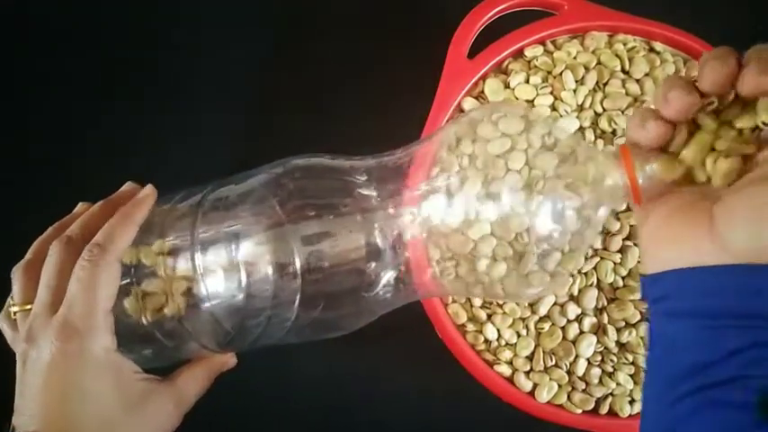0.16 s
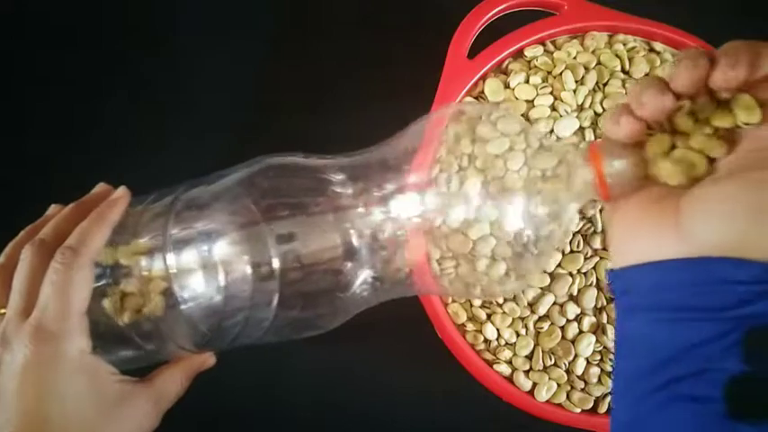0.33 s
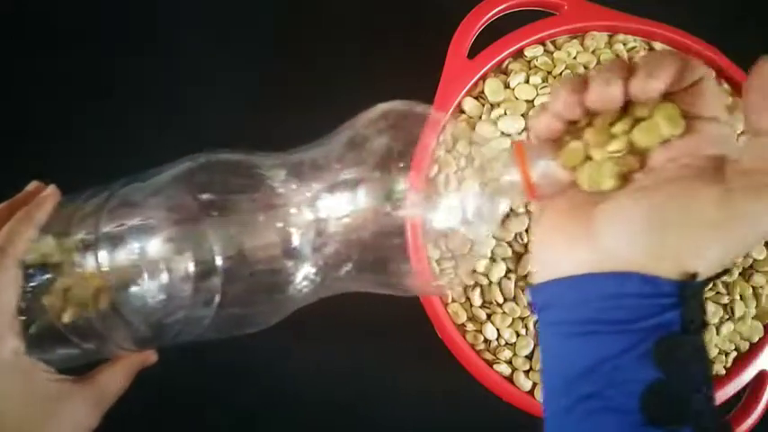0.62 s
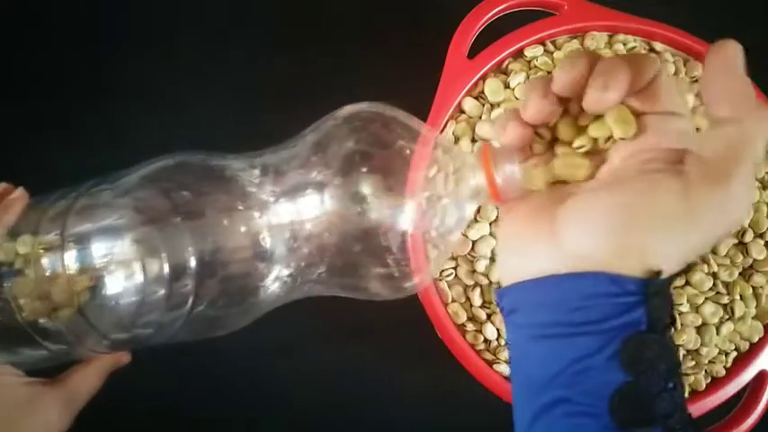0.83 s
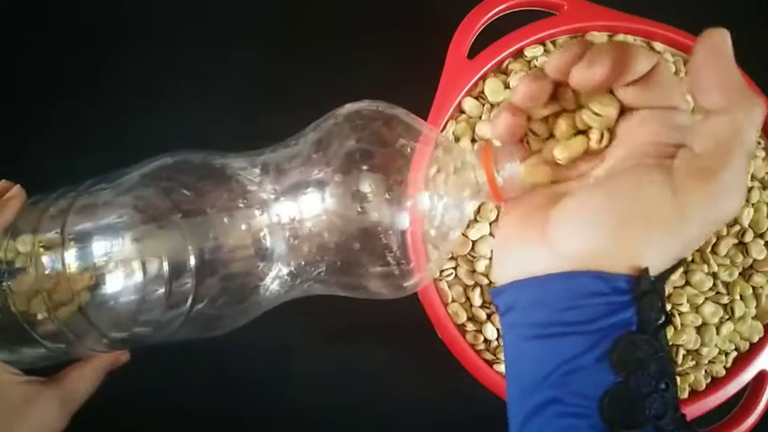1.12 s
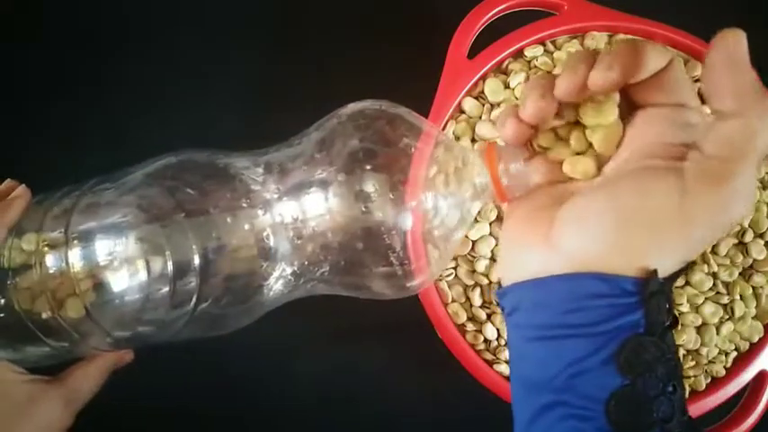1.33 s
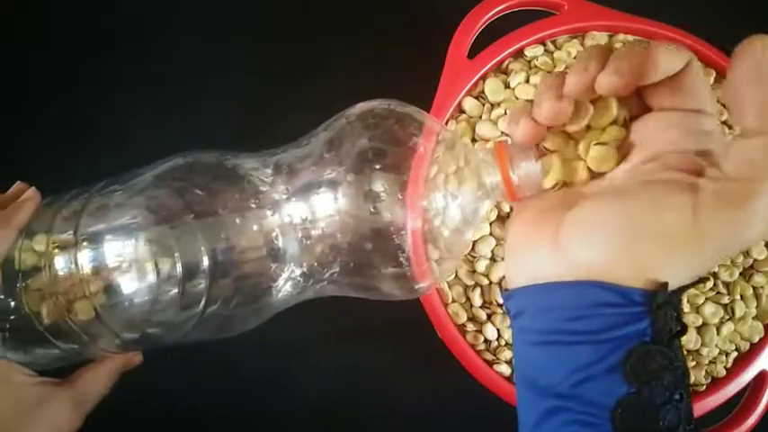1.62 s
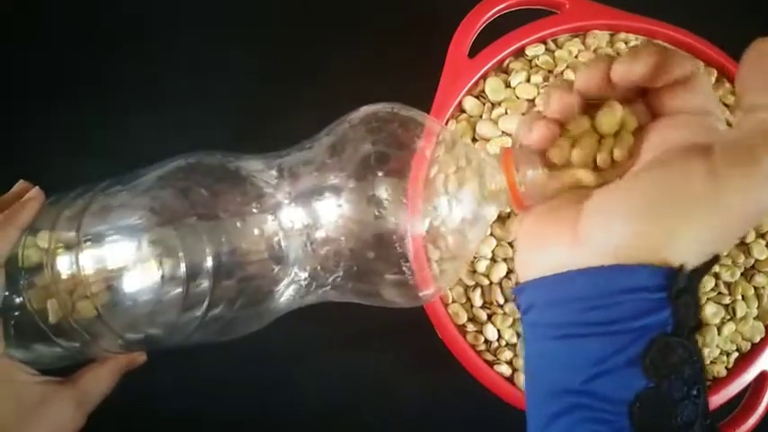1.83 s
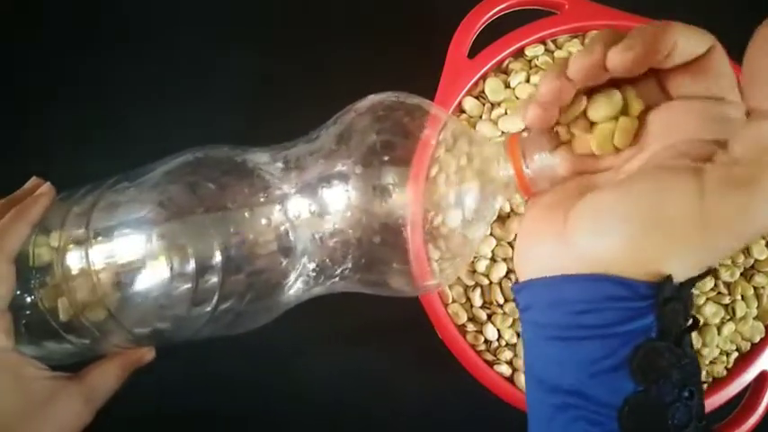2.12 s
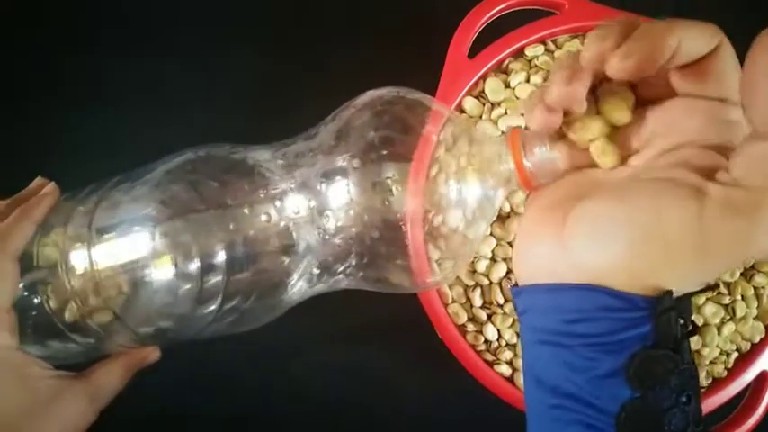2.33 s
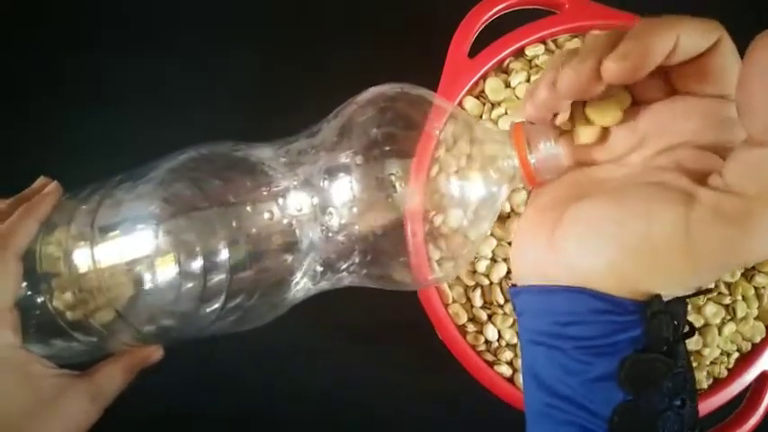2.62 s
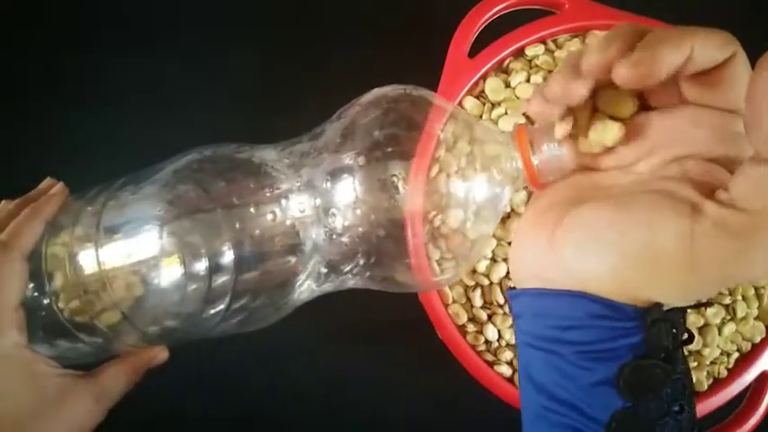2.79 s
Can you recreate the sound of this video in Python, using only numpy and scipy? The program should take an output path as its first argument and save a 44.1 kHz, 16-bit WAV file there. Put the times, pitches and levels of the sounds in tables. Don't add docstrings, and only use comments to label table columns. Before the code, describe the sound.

Dried beans rattle inside a plastic bottle for about three seconds. From 0 to 1 s they slide in, with a strong clack near 0.4; from 1 to 1.9 s they bounce in separate knocks, loudest near 1.5; then a denser slide clatters until the end. Dry midrange clacks, small bright clicks and a faint hollow hum, close, in a quiet small kitchen.

```python
import sys
import numpy as np
from scipy import signal
from scipy.fft import rfft, irfft, next_fast_len
from scipy.io import wavfile
from scipy.ndimage import uniform_filter1d

SR = 44100
rng = np.random.default_rng(int(sys.argv[2]) if len(sys.argv) > 2 else 0)


def file_out(sig):
    cols = np.atleast_2d(sig).T
    lim = np.clip(cols, -1, 1)
    pcm = np.round(lim * 32767).astype(np.int16)
    wavfile.write(sys.argv[1], SR, pcm)


def ratio_of_db(decibels):
    return 10 ** (np.asarray(decibels, float) / 20)


N = 130095


def along(points, hz):
    point_hz, value = np.transpose(points)
    return np.interp(np.log(hz + 1), np.log(point_hz + 1), value)


def filtered(x, points):
    size = next_fast_len(N + 8192)
    gain = ratio_of_db(along(points, np.fft.rfftfreq(size, 1 / SR)))
    gain = gain / np.sqrt(np.mean(gain ** 2))
    return irfft(rfft(x, size) * gain, size)[..., :N]


# frequency in Hz, level in dB per Hz.
AIR_COLOUR = [(20, 3), (90, 0), (200, -20), (300, -12), (500, 6), (5000, -11), (16000, -16)]


def air():
    a, b = filtered(rng.standard_normal((2, N)), AIR_COLOUR)
    return ratio_of_db(-63) * np.array([a + 1.1 * b, a - 0.74 * b])


RISE_S = 0.00056


def laid(times, shapes):
    land_s = 0.0011
    first = np.round((times + land_s) * SR).astype(int)
    at = first[:, None] + np.arange(shapes.shape[-1])
    return np.array([np.bincount(at.ravel(), side.ravel(), N + SR)[:N] for side in shapes])


def ringing(modes, weight_db, lag_s):
    hz, db, t60 = np.transpose(modes)
    t = np.arange(SR // 18) / SR
    rise = (1 - np.exp(-t / RISE_S)) ** 2
    fade_out = np.cos(t / t[-1] * np.pi / 2)
    fall = ratio_of_db(-60 * t / t60[:, None]) * rise * fade_out
    turn = 2 * np.pi * hz[:, None] * t
    sines, cosines = fall * np.sin(turn), fall * np.cos(turn)
    draw = rng.standard_normal((len(lag_s), 2, len(hz)))
    gain = ratio_of_db(db + weight_db + 4.5 * draw[:, 0])
    gain = gain / np.linalg.norm(gain, axis=1, keepdims=True)
    sides = []
    for side in (1, -1):
        phase = 0.79 * draw[:, 1] + side * np.pi * hz * lag_s[:, None]
        sides.append((gain * np.cos(phase)) @ sines + (gain * np.sin(phase)) @ cosines)
    return np.array(sides)


# frequency in Hz, level in dB, time to fall by 60 dB in seconds.
SHOULDER_TONES = [(1850, 7.5, 0.016), (2091, 5, 0.014), (2400, -4, 0.034), (2860, -2, 0.027),
                  (2980, 1, 0.026), (3400, 4, 0.0025), (4080, 6, 0.011)]


def shoulder_ring(centre_hz, lag_s):
    octave_like = np.log(np.array(SHOULDER_TONES)[:, 0] / centre_hz[:, None])
    near_db = -6 * (octave_like / 0.3) ** 2
    return ratio_of_db(-1) * ringing(SHOULDER_TONES, np.maximum(near_db, -18), lag_s)


# frequency in Hz, level in dB, time to fall by 60 dB in seconds.
HOLLOW_TONES = [(267, -14, 0.074), (373.6, 1.5, 0.049), (448, 12.5, 0.017), (711, -13.5, 0.19),
                (923, -1, 0.032), (1275, 5, 0.024)]


def hollow_thump(lag_s):
    left_db = 5
    sides = ratio_of_db(np.array([.5, -.5]) * left_db)[:, None, None]
    return ratio_of_db(-2) * sides * ringing(HOLLOW_TONES, 0, 0.5 * lag_s)


def dull_knock(hiss, t):
    return ratio_of_db(1.5) * np.repeat(hiss[2:], 2, axis=0) * ratio_of_db(-60 * t / 0.013)


def column(x):
    hz, t60_s = 694.2, 0.3
    keep = ratio_of_db(-60 / (t60_s * SR))
    feedback = [1, -2 * keep * np.cos(2 * np.pi * hz / SR), keep ** 2]
    return ratio_of_db(9.5) * signal.lfilter([1 - keep, 0, keep - 1], feedback, x)


# frequency in Hz, level in dB per Hz.
CLACK_COLOUR = [(800, -108), (1800, 10), (3200, -4), (4600, -8.5), (7000, -39)]


def dry_clack(s, hiss, t, level):
    burst = (hiss[2] + 0.5 * hiss[:2]) * ratio_of_db(-60 * t / 0.023)
    return filtered(laid(s, ratio_of_db(-14) * level * burst), CLACK_COLOUR)


# frequency in Hz, level in dB per Hz.
CLICK_COLOUR = [(1500, -94), (3400, -3.5), (5000, -8), (8800, -2.5), (11000, -14.5), (13500, -17.5),
                (16000, -23)]


def bean_click(s, hiss, t, size_draw, level):
    bean_hz = 8040 * np.exp(0.28 * size_draw[:, None])
    slow_hiss = uniform_filter1d(hiss[:2], size=16, axis=-1)
    voiced = hiss[:2] + ratio_of_db(12.5) * slow_hiss * np.sin(2 * np.pi * bean_hz * t)
    rise = 1 - np.exp(-t / 0.00064)
    fall = ratio_of_db(-60 * t / 0.012) + ratio_of_db(-15 - 60 * t / 0.06)
    return filtered(laid(s, ratio_of_db(-2) * level * voiced * rise * fall), CLICK_COLOUR)


def contacts(rows):
    s, ring_db, thump_db, click_db, centre_hz = np.transpose(rows)
    place, side, size_draw = rng.standard_normal((3, len(s)))
    lag_s = 7e-5 + 6e-5 * place
    pan = ratio_of_db(np.outer([.5, -.5], 7 * np.tanh(side) - 0.2))[..., None]
    ring_level = ratio_of_db(ring_db)[:, None]
    thump_level = ratio_of_db(ring_db + thump_db)[:, None]
    click_level = ratio_of_db(ring_db + click_db)[:, None]

    t = np.arange(SR // 36) / SR
    hiss = rng.standard_normal((3, len(s), len(t))) * (1 - np.exp(-t / RISE_S))
    ring = ring_level * pan * shoulder_ring(centre_hz, lag_s)
    body = laid(s, ring + thump_level * hollow_thump(lag_s))
    knock_colour = [(70, -13), (200, -12), (400, -2.5), (1400, -5.5), (3500, -63), (9000, -74)]
    knocks = filtered(laid(s, thump_level * dull_knock(hiss, t)), knock_colour)
    clacks = dry_clack(s, hiss, t, ring_level * pan)
    clicks = bean_click(s, hiss, t, size_draw, click_level * pan)
    return body + knocks + column(knocks) + clacks + clicks


# start in seconds, length in seconds, level in dB,
# click over ring in dB, thump over ring in dB.
ROLLING_BEANS = [(0, 0.052, -48.5, -14, -19), (0.085, .11, -41.5, -19.5, -16),
                 (0.195, 0.63, -46.5, -22, -16.5), (0.362, 0.18, -40, -9, -7), (0.556, 0.22, -38, -9, -7.5),
                 (0.782, 0.12, -42.5, -12.5, -7), (0.927, 0.039, -41, -10, -9),
                 (1.037, 0.23, -41.5, -11.5, -11), (1.291, 0.1, -56.5, -2, -8),
                 (1.417, 0.21, -42.5, -10, -6.5), (1.665, 0.1, -48.5, -10.5, -7.5),
                 (1.773, 0.078, -40, -9.5, -18), (1.923, 0.081, -46, -15.5, -7.5),
                 (2.032, 0.043, -39.5, -9.5, -10), (2.101, 0.19, -42, -8, -6.5),
                 (2.302, 0.15, -37.5, -9, -11.5), (2.463, 0.094, -44.5, -12.5, -7.5),
                 (2.585, 0.2, -42.5, -10, -8.5), (2.798, 0.074, -47.5, -6, -5.5),
                 (2.908, 0.25, -42.5, -16.5, -15.5)]


def rattle():
    count = int(580 * N / SR)
    moment, size = rng.random((2, count))
    thump_draw, click_draw, pitch_draw = rng.standard_normal((3, count))
    s = moment * N / SR
    start, length, level_db, click_db, thump_db = np.transpose(ROLLING_BEANS)
    roll = np.maximum(np.searchsorted(start, s) - 1, 0)
    age = s - start[roll]
    fade_db = 4 * age / length[roll]
    stop_db = 20 * np.clip((age - length[roll]) / 0.0039, 0, 2)
    size_db = -4.5 * np.log(size + 0.094)
    ring_db = level_db[roll] - fade_db - stop_db + size_db
    small_thump_db = thump_db[roll] + 5.5 * np.tanh(thump_draw)
    small_click_db = click_db[roll] + 5.5 * np.tanh(click_draw)
    centre_hz = (1800 - 64 * thump_db[roll]) * np.exp(0.2 * pitch_draw)
    return contacts(np.c_[s, ring_db, small_thump_db, small_click_db, centre_hz])


LANDING_BEANS = [(0.067, -21.5, -19, -28.5, 3030), (0.093, -35, -26, -23, 1930),
                 (0.114, -24, -28, -21, 2370), (0.151, -23, -18.5, -24, 2050),
                 (0.182, -27.5, -2.5, -6, 2500), (0.235, -28.5, -5.5, -3.5, 2900),
                 (0.271, -23, -3.5, -6.5, 1940), (0.304, -23, -11, -13.5, 2880),
                 (0.409, -26, -33, -37, 2300), (0.427, -13, -13, -15, 1850), (0.494, -25, -6, -6, 2400),
                 (0.526, -27, -4.5, -6, 2170), (0.544, -23, -2, -8, 1880), (0.66, -23, -13, -7, 2000),
                 (0.746, -18, -17, -22, 1720), (0.831, -28.5, -1.5, 0.5, 1800),
                 (0.857, -21, -29, -21, 2400), (0.933, -29, -20, -11, 1950),
                 (0.996, -28, 0.5, -5, 2170), (1.032, -34.5, 2, 3.5, 2110), (1.04, -20, -10.5, -20, 1770),
                  (1.08, -14, -42, -28, 2400), (1.126, -24.5, -12, -0.5, 2330),
                  (1.205, -23, -3.5, -11, 1890), (1.28, -30, -6, -10, 1840), (1.294, -24.5, -8, -5.5, 2160),
                  (1.317, -19, -18.5, -43, 2470), (1.353, -32, 0.5, -2.5, 1890),
                  (1.399, -24.5, -8.5, -7.5, 1850), (1.422, -19, -9.5, -8.5, 1850),
                  (1.444, -25, -5.5, -10, 1840), (1.485, -43, -8, -3, 1610),
                  (1.494, -10.5, -20.5, -20.5, 1850), (1.572, -27, -13, -6, 2030),
                  (1.581, -19, -37, -22, 3100), (1.658, -29, -6.5, -6.5, 2030),
                  (1.776, -21.5, -21.5, -10.5, 2500), (1.799, -28.5, -23, -16, 2900),
                  (1.905, -28.5, -0.5, -4.5, 1950),
                 (1.918, -23.5, -21, -39, 1880), (1.932, -32.5, -3.5, 1.5, 2390),
                    (1.942, -22.5, -8, -15, 1860), (2.017, -23.5, -18, -27, 2150),
                    (2.041, -30.5, -10.5, -1, 1900), (2.066, -26, -3.5, -4, 2200),
                    (2.106, -29.5, 0.5, -7, 1850), (2.168, -12, -25, -15.5, 1740),
                    (2.203, -15, -20, -7.5, 1720), (2.301, -22.5, -12, -7.5, 1760),
                    (2.378, -16.5, -37, -9.5, 1780), (2.4, -14.5, -28, -13, 1680),
                    (2.429, -16.5, -13, -15, 1980), (2.495, -14.5, -35, -43, 2980),
                    (2.525, -25, -6.5, -5.5, 1800), (2.605, -27, -7, -3.5, 1830),
                    (2.675, -19.5, -7, -7.5, 1920), (2.723, -20.5, -7.5, -6.5, 2270),
                    (2.764, -28.5, -18, 3, 2520), (2.807, -20.5, -11.5, -12, 1930),
                    (2.912, -32, -21, -29, 3020),
                 (0.0264, -38, -12, -17, 3030), (0.2644, -28, -12, -15, 1890), (0.3174, -30, -9, -5, 1870),
                  (0.3524, -29, -7, -4.5, 1860), (0.3631, -29, -3.5, -16, 2350), (0.386, -47, 5, -21, 2070),
                  (0.396, -17, -31, -31, 2460), (0.4373, -25, -15, -6, 1850),
                  (0.5801, -25, -8.5, -27, 1850), (0.5897, -25, -26, -27, 1880),
                  (0.6365, -26.5, -4, -7, 2110), (0.7084, -22.5, -13, -12, 2880),
                  (0.8004, -24.5, -17, -11.5, 1840), (0.8647, -26.5, -10, -10, 2150),
                  (0.957, -43, -3, -1.5, 1840), (1.0907, -27, -14, -9, 2030), (1.1865, -25, -10, -18, 3000),
                  (1.2172, -25, -11, -12, 2080), (1.2333, -39.5, -10, 5.5, 2420),
                  (1.7393, -46.5, -2, -2, 1890), (1.8112, -23.5, -27, -12, 2970),
                  (1.837, -36, -15, -10, 2860), (1.9888, -40, -18, -17, 2340),
                  (2.0487, -24, -8.5, -8.5, 2400), (2.1218, -31.5, -5, -1, 1970),
                  (2.1424, -46, -6, -3, 2180), (2.1631, -21, -10, -14.5, 1860), (2.2445, -38, -7, 4, 2430),
                  (2.2681, -33, 2, -1.5, 1830), (2.3169, -18.5, -22, -11, 2230),
                  (2.3253, -20.5, -19, -14, 1940), (2.414, -18.5, -20, -10.5, 1910),
                  (2.4884, -34, -11, -12, 2940), (2.5305, -26.5, -4.5, -9, 1850),
                  (2.574, -33.5, -5, -4, 1930), (2.6306, -24, -18, -6.5, 2160),
                  (2.6692, -32, -14, -1, 1920), (2.7094, -25.5, -14, -1.5, 2470),
                  (2.8164, -29, -20, -9, 2080), (2.8265, -24, -15, -20, 1970)]


def landings():
    return contacts(np.array(LANDING_BEANS))


# frequency in Hz, time to fall by 60 dB in seconds.
KITCHEN_DECAY = [(200, 0.17), (10000, 0.05)]


def kitchen(x):
    hz, t, z = signal.stft(rng.standard_normal((2, SR // 3)), SR, nperseg=256)
    alike = np.exp(-hz / 900)[:, None]
    z = np.array([z[0], alike * z[0] + np.sqrt(1 - alike ** 2) * z[1]])
    fall = ratio_of_db(-60 * t / along(KITCHEN_DECAY, hz)[:, None])
    tail = signal.istft(z * fall, SR, nperseg=256)[1]
    tail = tail / np.linalg.norm(tail[0])
    late = np.pad(x, ((0, 0), (130, 0)))
    return ratio_of_db(-9.5) * signal.fftconvolve(late, tail, axes=1)[:, :N]


def scene():
    beans = landings() + rattle()
    return beans + kitchen(beans) + air()


def roll_off(x):
    return signal.sosfilt(signal.butter(12, 16500, fs=SR, output="sos"), x)


# frequency in Hz, level in dB.
PHONE_PORTS = [(30, -25.5), (110, -3.5), (14000, 1.5), (16800, -24)]


def record(dry):
    mix = filtered(dry, PHONE_PORTS)
    return roll_off(mix)


dry = scene()
out = record(dry)
file_out(out)
```